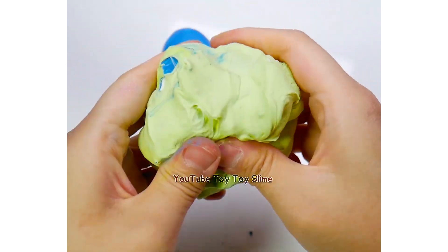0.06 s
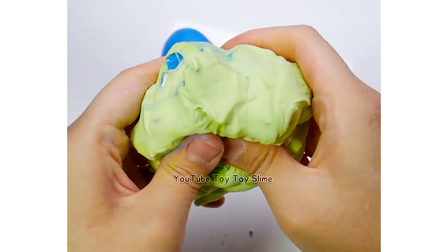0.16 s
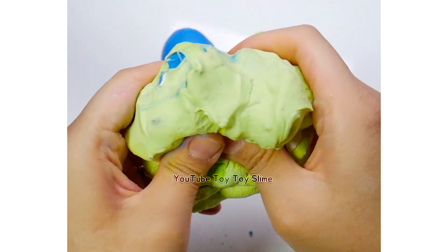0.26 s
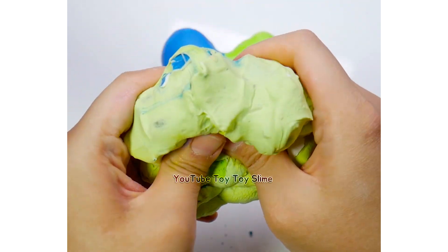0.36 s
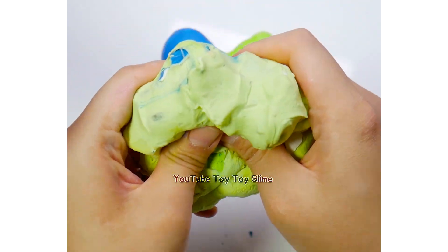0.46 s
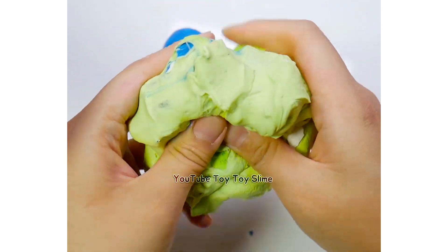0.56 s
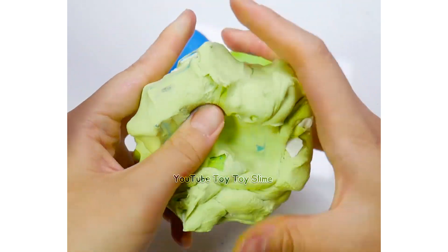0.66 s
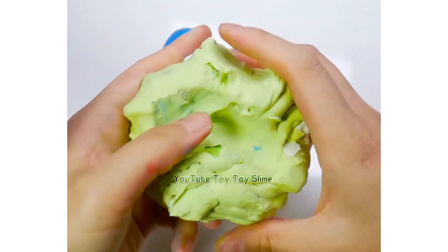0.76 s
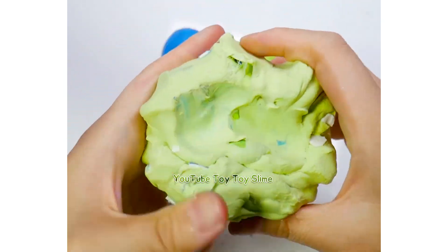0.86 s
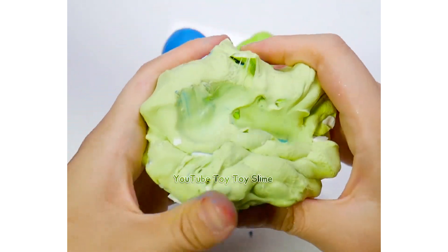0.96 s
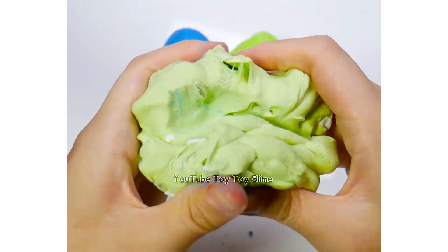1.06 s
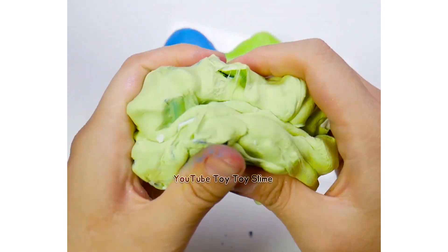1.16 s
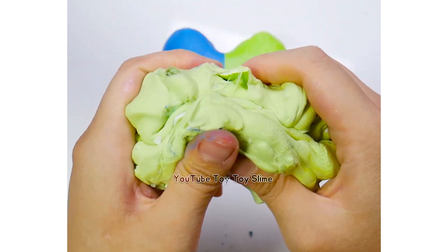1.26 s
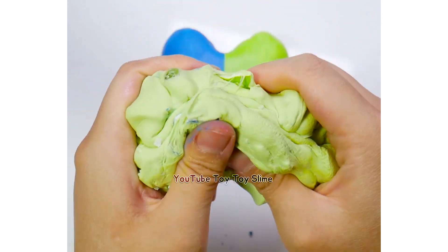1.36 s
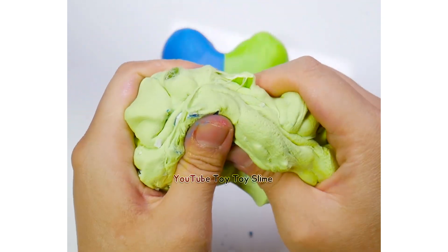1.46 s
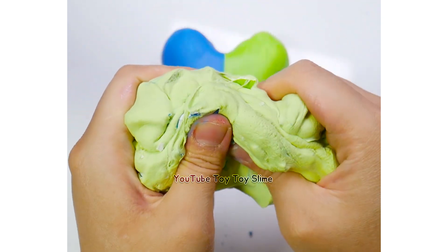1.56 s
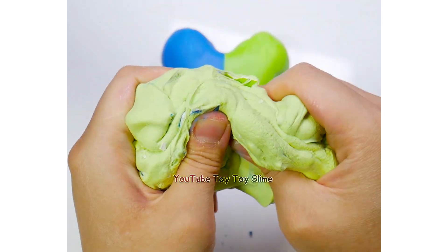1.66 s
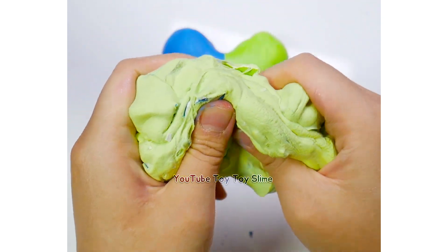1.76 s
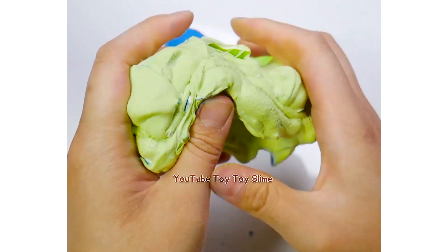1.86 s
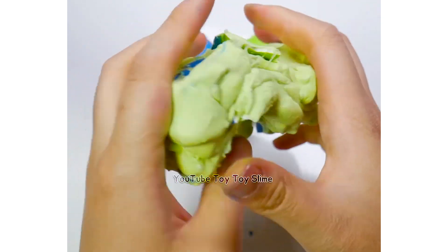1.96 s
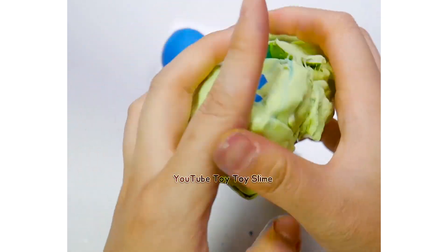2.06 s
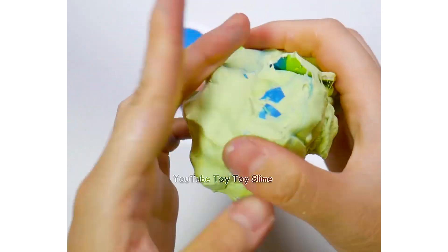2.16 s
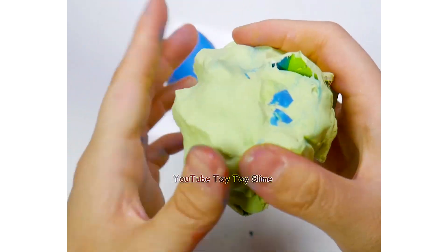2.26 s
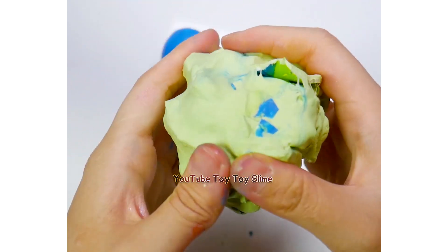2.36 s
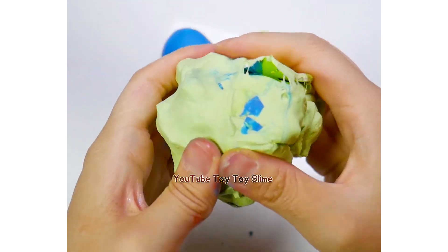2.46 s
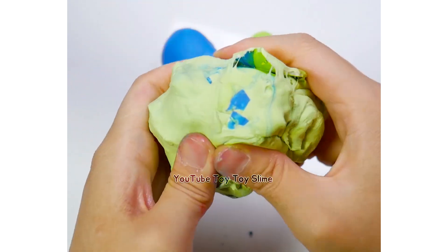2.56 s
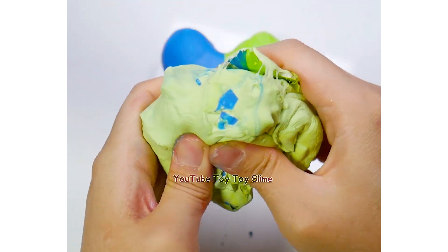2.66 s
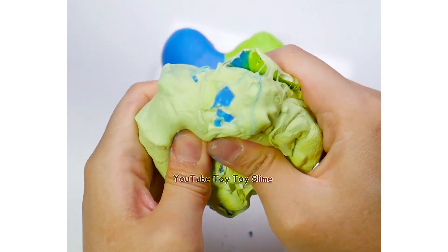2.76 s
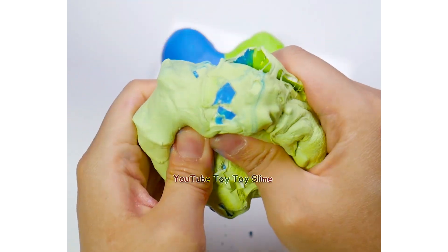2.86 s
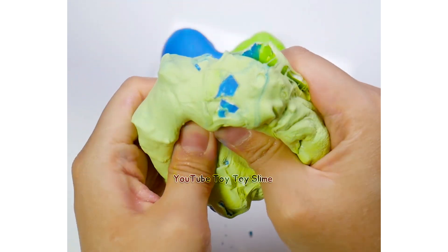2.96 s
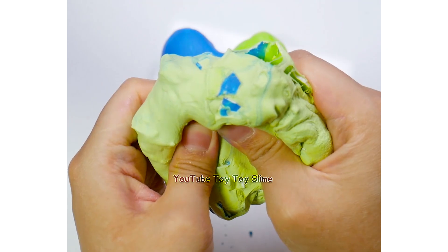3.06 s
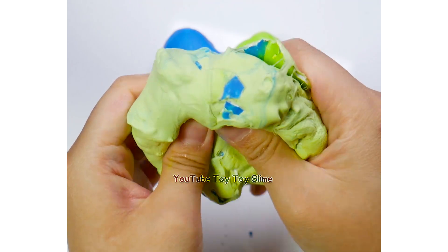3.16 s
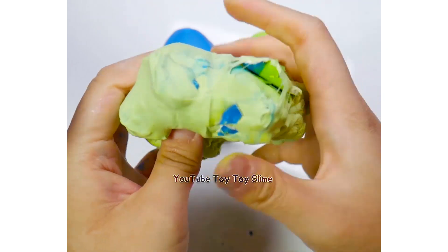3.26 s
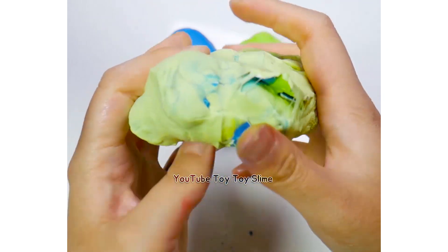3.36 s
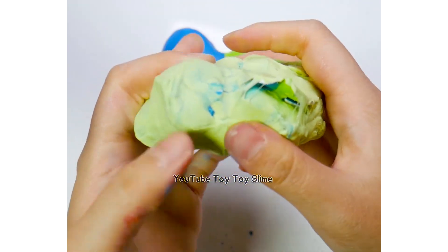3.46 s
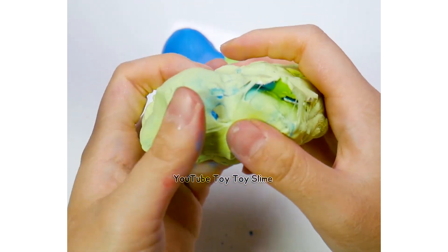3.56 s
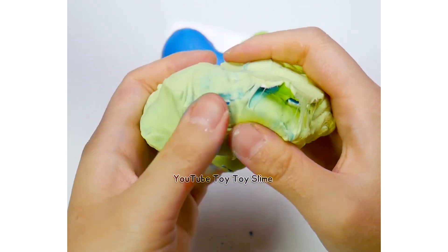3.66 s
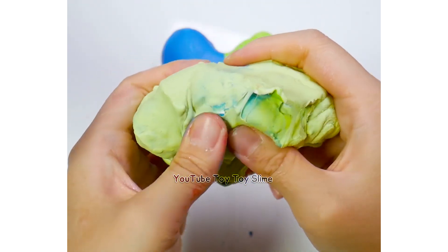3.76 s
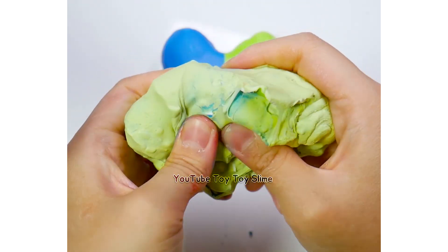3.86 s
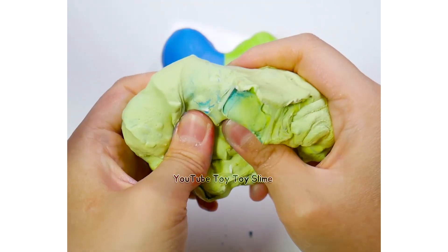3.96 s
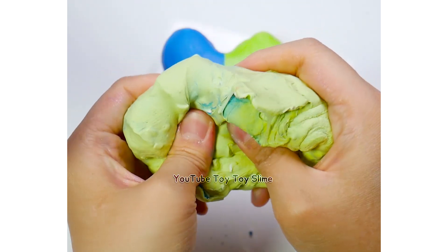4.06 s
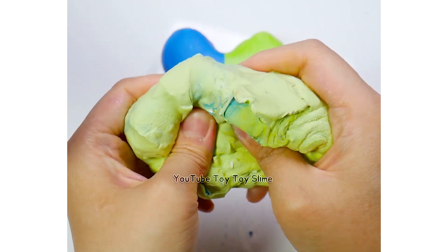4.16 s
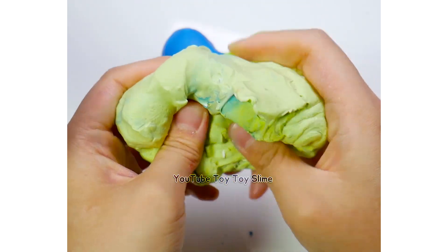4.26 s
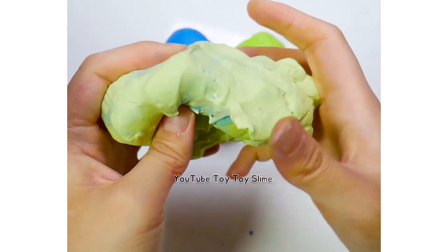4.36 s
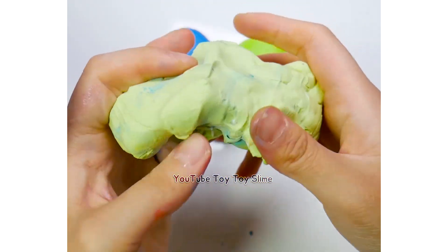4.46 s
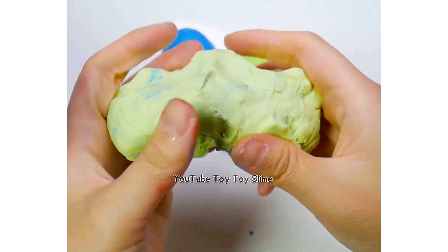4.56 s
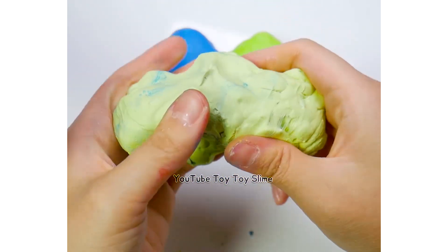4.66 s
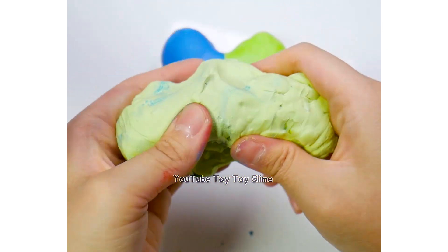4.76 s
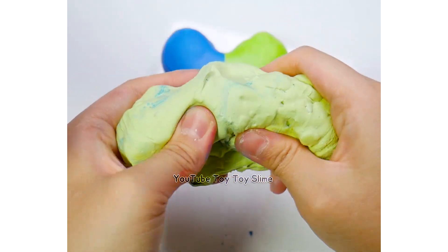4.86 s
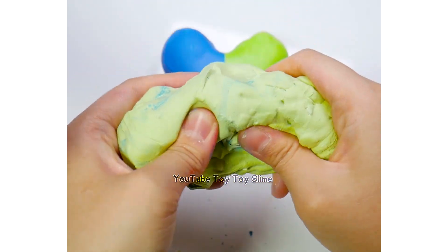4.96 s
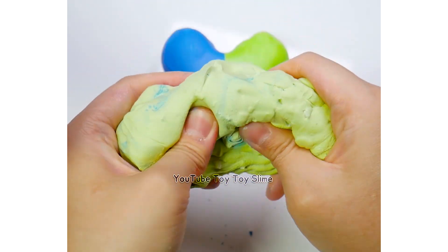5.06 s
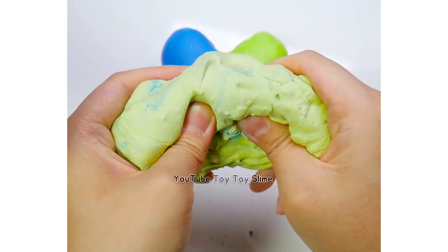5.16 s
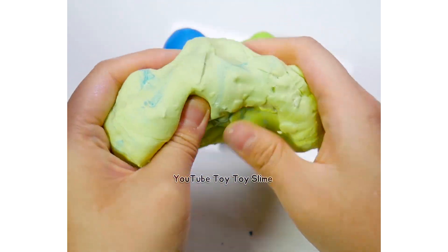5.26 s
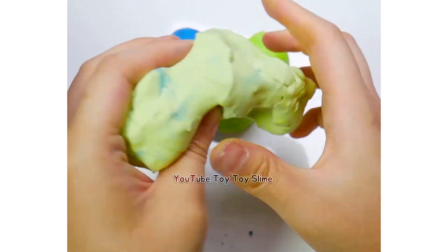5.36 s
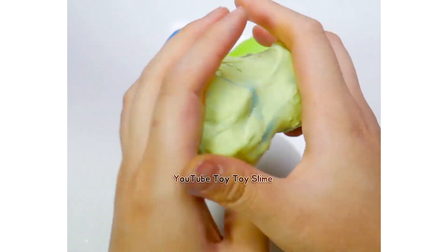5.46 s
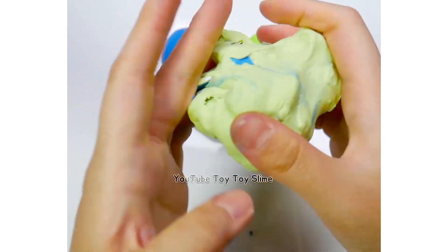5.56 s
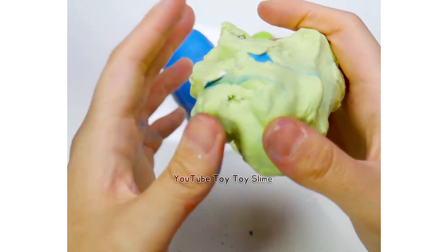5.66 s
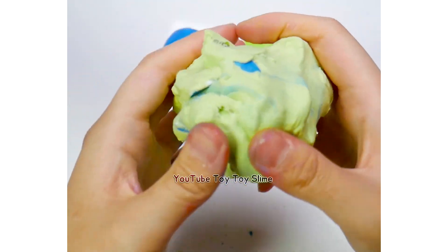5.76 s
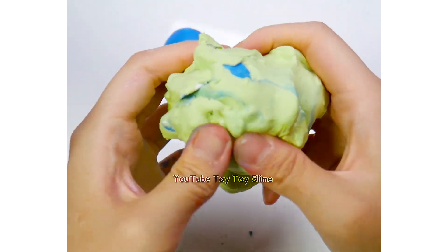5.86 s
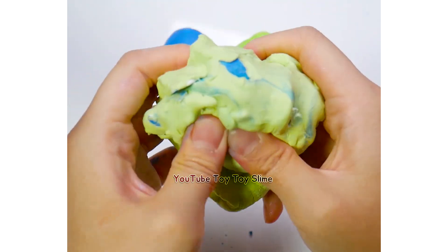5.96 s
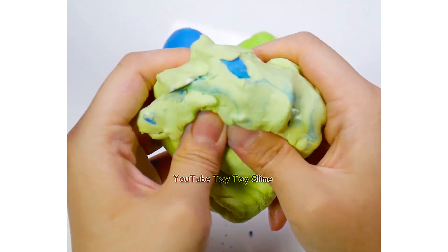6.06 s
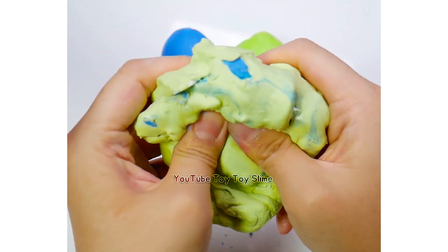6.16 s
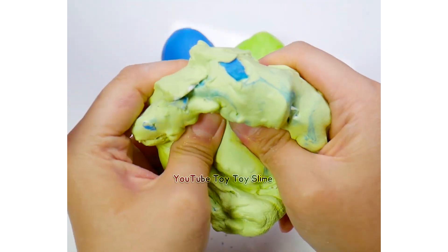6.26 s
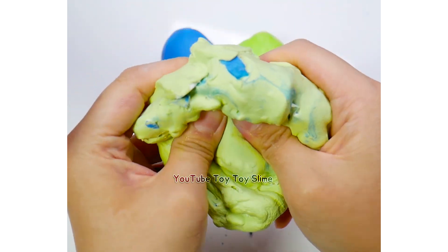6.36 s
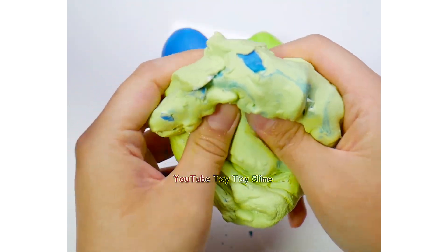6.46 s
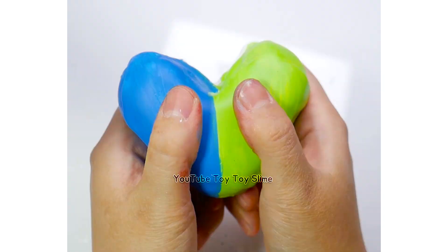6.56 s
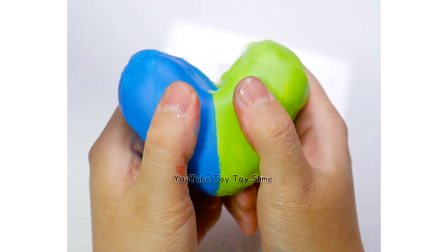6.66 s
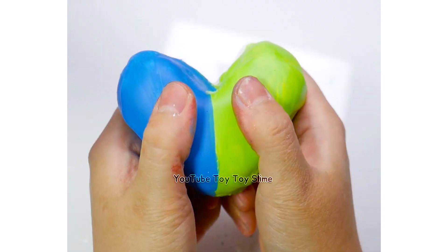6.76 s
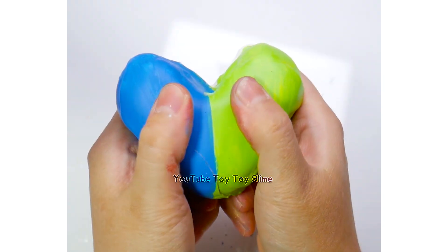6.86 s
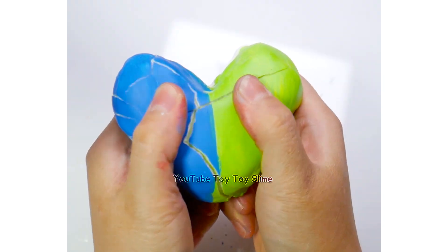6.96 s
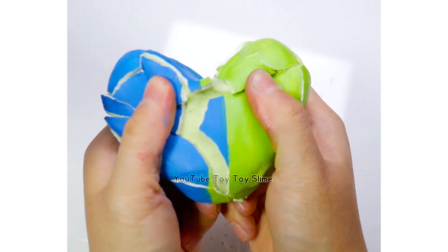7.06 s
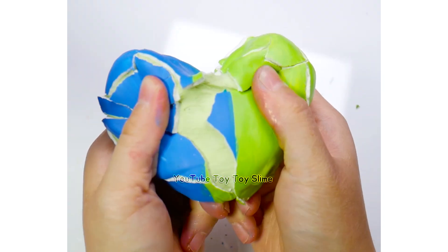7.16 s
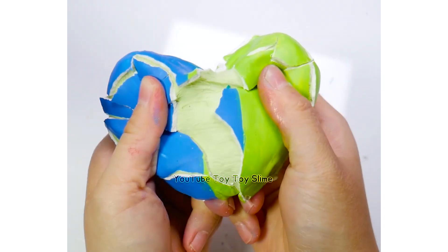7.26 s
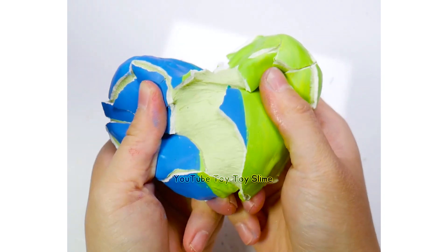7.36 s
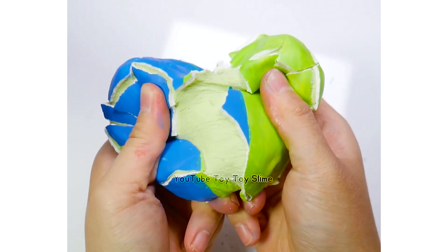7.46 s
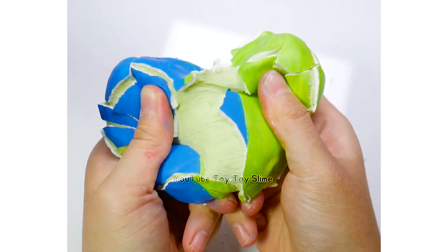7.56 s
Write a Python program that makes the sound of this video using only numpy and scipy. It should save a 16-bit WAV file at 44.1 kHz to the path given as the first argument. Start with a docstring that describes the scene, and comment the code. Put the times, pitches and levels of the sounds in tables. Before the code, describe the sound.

A close microphone in a small, fairly dry room, with faint room tone and hiss. Two hands knead soft clay full of brittle shards. From 0 to 0.5 s bright snaps click in a quick cluster; a sticky peel follows at 0.6 s, then harder pops around 1.2 to 1.55 s. A broad tacky crackle swells at 1.9 s, then fine clicks until a strong tight run of snaps at 2.6 to 3.0 s. Another peel comes at 3.3 s, dense cracking from 3.75 to 4.2 s, and a sticky rip at 4.3 s. Isolated loud pops land near 4.9 and 5.05 s, soft peeling at 5.3 s, more snaps at 5.9 to 6.3 s. A last tacky release at 6.57 s gives way to faint creaks; at 7.0 s a fresh shell breaks in a hollow, dense crunch, trailing into sparse crumbling ticks by 7.6 s. Low dull palm pushes run underneath.

```python
"""In a small room, close to a microphone, two hands knead soft clay full of shell shards, then crack a fresh shell.
Breaks are short pairs of decaying rings; sticky dough is a dense crackle of random ringing grains.
The creaking shell is a train of slips sent through resonances; pushing palms are low noise.
Echoes and fading noise make the room, with steady room tone and hiss behind.
The loudest snaps overload the input."""
import sys
import numpy as np
from scipy import signal
from scipy.fft import rfft, irfft, next_fast_len
from scipy.io import wavfile
from scipy.ndimage import uniform_filter1d

SR = 44100
rng = np.random.default_rng(int(sys.argv[2]) if len(sys.argv) > 2 else 0)


def store_pcm(level_fs):
    """Save levels as 16-bit WAV."""
    pcm = np.round(np.clip(level_fs, -1, 1) * 32767).astype(np.int16)
    wavfile.write(sys.argv[1], SR, np.atleast_2d(pcm).T)


N = 335601   # length in samples
STEP = 32   # slow level curves are worked out once per this many samples

# Colour of the room tone. Each row: frequency in Hz, relative level in dB per Hz.
AIR_COLOUR = [(15, -44.5), (25, -36), (123, 11), (175, -26), (326, 14), (476, 5.5), (1230, 1), (2220, -18),
              (3620, -0.5), (4740, -17), (14800, -8.5), (16000, -19.5)]
AIR_DB = -55
# Colour of the steady hiss. Each row: frequency in Hz, level in dB before HISS_DB is added.
HISS_COLOUR = [(30, 13), (300, 18), (2000, 17), (16000, 15)]
HISS_DB = -67.5
# How long the room rings. Each row: frequency in Hz, time to fall 60 dB in seconds.
ROOM_T60 = [(200, 0.27), (530, 0.3), (1400, 0.19), (3700, 0.24), (9700, 0.11)]
# Colour of the sound from the walls. Each row: frequency in Hz, relative level in dB.
ROOM_COLOUR = [(200, -27.5), (700, -29), (1500, -20.5), (2600, -24), (3800, -26), (5500, -32.5),
               (12000, -30)]
# Echoes from the table and near walls. Each row: delay in milliseconds, level in dB.
ECHOES = [(3.6, -20), (5.2, -25), (15.0, -31.5)]
WALLS_MS, WALLS_RISE_MS = 9.4, 2.5   # when the fading noise starts, and how long it fades in
# Colour of what differs between left and right. Each row: frequency in Hz, relative level in dB.
WIDTH = [(100, -4), (1000, -12), (4000, -8), (8000, 2), (15000, 1)]

# Dull pushes of the hands. Each row: time of the top in seconds, level in dB.
PUSHES = [(0.23,-43),(0.36,-40),(0.44,-47),(0.642,-30),(0.82,-41),(0.95,-45),(1.24,-50.5),(1.32,-45),(1.909,-29.5),(2.2,-38.5),(2.35,-39.5),(2.385,-40),(2.67,-51.5),
          (2.779,-35),(3.27,-43),(3.35,-34.5),(3.601,-34.5),(3.809,-32),(4.13,-48),(4.34,-37.5),(4.56,-36),(4.639,-29.5),(4.9,-45.5),(5.07,-42),
          (5.34,-36),(5.49,-35.5),(5.62,-44.5),(5.931,-37.5),(6.18,-41),(6.29,-46),(6.57,-40),(6.72,-45.5),(6.93,-32),(7.06,-20),(7.2,-50),(7.4,-57),(7.61,-46)]
PUSH_RISE_S, PUSH_FALL_S = 0.04, .05   # seconds per 20 dB
GRIP_DB = -58   # the steady grip below the pushes

# Colour of the dough grains. Each row: frequency in Hz, relative level in dB per Hz within its size group.
CRACKLE = [(120, -36), (200, -10.5), (749, 10.5), (899, -1), (1040, -24), (1250, 4.5), (2170, 9.5),
           (3690, 15.5), (13100, -17.5), (16000, 9.5)]
# The two borders between coarse, middle and fine grains, in Hz.
GRAIN_BORDERS_HZ = [1500, 5000]
GRAINS_PER_S, UNEVEN_DB = 20000., 2.5   # grains of all pitches together; scale of their random strength
# Fingers slide on the lump throughout. Each row: time in seconds, level of the fine grains in dB.
SLIDE = [(0,-44.5),(0.3,-56),(0.72,-58),(0.89,-75),(1.03,-69),(1.15,-52),(1.7,-52.5),(1.78,-63),(2.05,-56.5),(2.33,-79),(2.5,-54),(2.62,-45.5),(3.05,-81.5),(3.4,-68),(3.55,-51),(3.7,-67),(3.85,-56),
         (4.2,-67.5),(4.55,-49.5),(4.85,-68),(5.2,-73),(5.55,-49),(5.8,-68),(6.3,-62),(6.62,-73),(7,-40),(7.61,-49.5)]
# Coarse and middle grains of the slide, both in dB relative to the fine ones.
SLIDE_GRAINS_DB = [-5, -1]
# Dough peels off the skin in swells. Each row: time of the top in seconds, fine grains in dB,
# middle and coarse grains in dB relative to fine, seconds to rise 20 dB, seconds to fall 20 dB.
# Slopes below 2 ms, also negative ones, count as 2 ms.
PEELS = [(0.612,-32.5,2,1,0,0.06),(0.636,-23.5,0.5,-0.2,0.0261,0.0738),(0.74,-53,7,-4,0.5,-0.4),(0.802,-49,10,-1,0.14,-0.09),(1.066,-43.5,3,4.5,.015,0.02),(1.882,-22,-1,-7.5,.055,.11),
         (2.164,-43,-7,-11,0.1,0.16),(2.276,-44.5,-1,-3.5,0.23,0.1),(3.292,-24.5,0.5,-4.5,0.0658,.05),(3.342,-38,3,2.5,.03,0.02),(3.449,-40,3,2,0.02,0.04),(3.49,-40,-2,-6,0.06,0.11),(3.76,-48,11,6,-0.12,0.22),(3.93,-48,-1,-5.5,-0.2,0.4),(4.309,-35,6.1,0,-0.03,.03),(4.326,-24,-0.5,-1,0.01,0.11),
         (4.379,-33.5,-4,-3,0.01,.065),(4.479,-47,-9,-2.5,-0.5,0.2),(4.552,-40,0,0,-0.13,0.1),(4.626,-33.5,0.7,-11,-0.18,0.0357),(5.334,-23,-1.5,-6,0.04,0.0946),(5.481,-33.5,-3,-1,0.02,0.11),
         (5.664,-34.5,-4.5,-5.5,.05,0.02),(6.05,-54.5,8,3.5,0.36,0.3),(6.529,-38,7,1.1,0,-0.19),(6.57,-20.5,0.3,-6,0.04,0),(6.933,-34,4.5,-8,0,-0.25),(7.07,-32,-9,2,0.0056,0.14),(7.199,-35,13,1.1,0.0065,-0.09),(7.425,-39,5.5,7,-0.27,0.03)]
# After a break the shard crumbles in grains near the pitch of its rings.
CRUMBLE_DB, CRUMBLE_OCTAVES = -44, .45   # level added to the break's wall level; spread in pitch
CRUMBLE_DELAY_S, CRUMBLE_FALL_S = 0.0058, 0.078   # from break to top; seconds to fall 20 dB

# Shards, and last the fresh shell, creak under the thumbs in bouts.
# Each row: time of the top in seconds, level in dB, hollow body in dB relative to that level.
CREAK = [(0.19,-44,-5),(0.47,-32,-21),(1.12,-49.5,-15),(1.16,-38.5,-22),(1.2,-42,-18),(2.03,-46,-17),(2.09,-46,-9),(2.56,-46.5,-13),(2.6,-40.5,-13),(3.18,-51,-15),
         (4.83,-56,-16),(5.83,-50.5,-14.5),(6.08,-49.5,-14),(6.13,-48.5,-15),(6.731,-45,-8),(6.8,-48,-2),(6.889,-30.5,-9),(6.94,-33,-3),(7.04,-19.5,4),(7.15,-25,-7),(7.22,-37,-3),(7.33,-78,-2)]
CREAK_RISE_S, CREAK_FALL_S = 0.041, 0.095   # seconds per 20 dB
# Rings of the shell wall. Each row: frequency in Hz, width in Hz, relative level in dB.
SHELL = [(2930, 170, 7), (3750, 400, 1), (6400, 2400, -8.5)]
# Air and body under the shell. Each row: frequency in Hz, width in Hz, relative level in dB.
HOLLOW = [(333, 110, 1.5), (495, 170, -2.5), (800, 240, -4.5)]

# The breaks that stand out. Each row: start in seconds, ring level in dB, main ring in Hz, second ring in Hz,
# second ring in dB relative to the main one (6 at most), sharp edge in dB before a 10 dB cut,
# time for the rings to fall 60 dB in milliseconds, share sent to the walls in dB.
SNAPS = [(0.018,-18,2690,6100,-16,-13,3.1,15.5),(0.1225,-27,2520,1464,-19,-55.5,12,-4),(0.1788,-15.5,3400,8850,-5.5,-33,2.8,11),(0.2282,6.5,2240,1210,-56,-33,4.9,-0.5),
         (0.2882,-13.5,1780,3320,-4,-34,4.4,3),(0.2975,-12.5,3400,1647,-19,-39,7,10),(0.323,-5.5,850,1560,-0.5,-25,11,5),(0.3407,-10,3500,1800,-14,-41,5.3,2.5),
         (0.3457,3.5,3250,1770,-5.5,-23,11,2),(0.3616,-12.5,2637,5230,-20,-30,10,-3),(0.4032,-17.5,8947,2870,2,-6,7,0),(0.419,-24,3262,1860,-12,-30,7,-5),(0.447,7.5,3910,5060,-7.5,7,6.9,6),
         (0.448,-9,4330,2900,-14,-30,7.7,-6),(0.456,-11,3630,2840,6.5,-25,18,-9),(0.4734,-11.5,3870,2930,-12,-38,19,-3),(0.6213,-13,2850,1475,-2,-8,5.5,-3),
         (0.635,-7.5,750,4300,-2,-3,4.2,-18),(0.7974,-8.5,3040,1600,-12,-32,5,8),(0.806,-16.5,1300,3370,-3,-30,6.9,-3),(0.815,6,3480,6600,-9,-19,3,-10.5),(0.9373,-24.5,3700,6400,-6,-38,8.8,6),
         (0.9505,-31.5,8031,2950,-5,-20,7.4,21.5),(1.1785,-22.5,3120,1940,-5,-31,6.5,16),(1.2349,11.5,3420,870,0,-23,8.5,0.5),(1.2814,9,6000,3040,-29,-14,6.7,1),
         (1.299,13.5,8210,3380,-1,23,5.5,1.5),(1.3097,-13,3820,8214,-14,-19.5,6,-3),(1.355,-3.5,673,405,-44,-3,16,2.5),(1.4356,-11.5,3750,2190,-13,-11,4.3,6),
         (1.4437,-1,3630,1658,-23,-20,5.3,1),(1.4611,-14,3420,1894,-10,-15,7,1),(1.5103,-24,4425,7730,-11,-23,4,-3),(1.5348,-26,1970,3640,-15,-32,7.6,8),(1.549,10,3700,1940,-7.5,-37,1.9,-3.5),(1.615,-23.5,3300,5740,-5,-25,7,-3),(1.8866,-9,660,3500,-1.5,-19,15,12),
         (1.9032,-11,2960,7960,-1,-17,15,-3),(1.9165,-7,2520,5160,-3,-4,6.5,0),(1.9332,-13.5,9000,3700,-1,-18,8.7,-5),(1.9637,-13,3500,1240,0.5,-29,5.4,-1),
         (2.0751,-21,3620,6815,-28.5,-18,8.7,8),(2.0858,-23,3530,1900,-10,-22,6.8,1),(2.1993,-19,3550,8000,-3.5,-4.5,21,3),(2.2406,-22.5,627,1320,-3,-7,19,5),(2.279,-13.5,2800,7500,-7,-6.5,3.4,-18),
         (2.369,-25,3000,524,0.5,-29,8,6),(2.4364,-3,2440,6100,-3,-26,1.46,-4),(2.4876,-26.5,3580,8462,-17,-15.5,6.1,-8.5),(2.5367,-27.5,4800,9100,-9.5,-32,18,-3.5),(2.603,-22,2444,4263,-7,-55,7.8,0.5),(2.6152,-11.5,2820,1540,-11.5,-23,2.6,8),
         (2.6502,6,2520,1220,-7,10.5,3.7,-2),(2.6674,-9,2730,7000,-14,-31,8.9,7.5),(2.685,-6,3500,1270,-4,-33,6.8,-14),(2.7031,11.5,1470,850,-8.5,-13.5,8.2,2.5),
         (2.7055,4,1450,2550,-14,3,3.5,-9.5),(2.7565,-4,2131,3570,-3,-23,9.5,-4),(2.7706,5.5,2260,940,0.5,-20.5,16,-6),(2.777,9.5,1760,827,2,-11,7.9,1.5),
         (2.783,4,2050,1230,-1,-18,12,6),(2.8157,16.5,885,450,-34,-8,6.2,-11.5),(3.0137,3.5,2670,950,-14.5,-38,5,0),(3.0206,-8,2010,1310,-0.5,-39,7,5.5),
         (3.113,-29.5,3700,1800,-1.5,-40,6,0),(3.2441,-16,7999,3970,-2,-29,7,-12),(3.257,-16,4360,1250,-3,-22,25,-6),(3.2661,-7,3940,1180,-2.5,-26,11,9),(3.306,-11.5,4760,2850,-3,-18,8.8,-3),
         (3.4484,-21.5,1760,5500,-5,-37,14,9),(3.549,-27,3040,5157,-14,-35,7,1),(3.5887,-21,2637,290,-2.5,-21,4.4,2),(3.593,-7.5,3750,2050,-9,-3.5,3.3,2.5),(3.6126,-11,4630,7570,0.5,-6,2.9,-12.5),(3.7519,-23,1345,3040,3,-37,7.7,17),
         (3.7711,-2,5630,1350,2.5,-7,1.85,-2.5),(3.7838,-9.5,7550,3380,-5,-14,5,-4),(3.7914,-13,3180,2010,-1,-39.5,8.3,-16),(3.8119,7.5,2590,1720,-1,-12,5.7,0.5),
         (3.8456,-10.5,3160,1870,-8,-24,7.1,-1),(3.9541,2,1600,2630,-5,-28,3.8,-0.5),(3.9698,7,2660,1360,-0.5,-27,9,-4),(3.987,8.5,2720,1320,-5.5,-5,4.5,-1),
         (4.09,-22.5,1660,3100,-5,-22,7.7,8),(4.1134,-8.5,2130,3811,-17,-15,7,7),(4.128,10,790,2820,-4,-2,7.3,-6.5),(4.1427,16,2360,1470,0,-12,4.5,-9.5),
         (4.1546,-0.5,3300,1910,-4,-20.5,4.4,2),(4.1731,-19,8900,3730,0,0,12,-11),(4.3262,-9.5,3620,9540,-2,2,9.5,12.5),(4.4712,-22.5,5700,1250,-8,-24,8,-3),
         (4.485,-22.5,4000,1040,2,-13,12,-1.5),(4.5754,-45,7860,3550,-1,-21,3.6,5),(4.63,-20.5,4700,1270,2.5,-9,5.7,5),(4.755,-32,5300,3000,-5,-40.5,5.4,-3),(4.7698,-22.5,5170,2730,-4,-40,6.1,4),
         (4.8975,15.5,736,2160,-9.5,-27.5,8.2,-3),(4.9655,-25.5,5500,3800,-17,-35,7.2,7.5),(5.051,15.5,894,3254,-4,9.5,7.6,-3),(5.1185,4,2280,4000,0,-11,2.6,-7.5),
         (5.223,-36.5,7100,5000,-10,-41.5,3.4,7),(5.3167,-11,8500,3940,-14,-4,8.7,2.5),(5.3232,-13.5,9030,908,2.5,-14,23,6),(5.3926,-15,6400,3768,-16,-25,7.4,-2.5),(5.417,-21,6115,2250,2,-31,4.7,15.5),
         (5.4717,-16.5,3450,6560,-7,-6,7.7,-4),(5.486,-17,2800,1150,1,-13,7.7,-3.5),(5.5651,-17.5,3840,2130,0,-16,5.5,7.5),(5.6198,-14.5,2700,860,1.5,-7,10.7,10.5),
         (5.6527,-21,1260,7385,-17,-26,9.4,0),(5.6732,-20.5,7400,3000,-3.5,-12,14,-1.5),(5.7126,-32,5480,3160,-4.5,-19,8.4,-4),(5.8869,4.5,2070,3770,-1.5,-7,5.4,-4),(5.924,7.5,2500,3850,-2,-23,3.8,-2),
         (5.9628,12,3700,8900,-13,5.5,5.5,-2.5),(6.1799,8.5,2670,1760,-9.5,-16,7.6,-1.5),(6.1953,-18,2500,4446,-18,-46,9.1,-3),(6.2862,10.5,2530,778,-2.5,-12,7.2,4),
         (6.3717,-10.5,3250,880,-0.5,-43,6.9,2.5),(6.455,-18.5,7360,3960,-11.5,-32,7.7,3),(6.5154,-17.5,1230,2920,-4,-33,8,4),(6.5566,-13,5130,2970,-10,-10,6.3,-9),
         (6.721,-20.5,444,820,-53,-58,28,8.5),(6.757,-30,3563,6300,-3,-39,8.2,-1),(6.802,-29.5,462,3000,-17,-32,10,-7),(6.84,-25,460,9100,-4,-35,7,-1),(6.8519,-16,3380,440,3,-29,5.4,9),(6.8758,-7,494,894,-13,-33,3.7,1),(6.8806,-11,686,1420,3.5,-16.5,2,8),
         (6.908,-7,624,1090,-11,-35,4.8,-11),(6.9235,-4,368,925,-17,-26,13,-6),(6.933,-13,549,312,-5,-10,7,-3),(6.971,-8.5,3897,810,2.5,-28,2.7,1),
         (7.0081,-13,462,807,-18,-21.5,8.6,0),(7.021,14.5,3690,580,4.5,-8,8.4,-13),(7.0313,17,3700,510,-3,-7,7,-10.5),(7.035,13,545,1290,1,1,6,-7),
         (7.0378,14,2850,500,-28,-10,10,10.5),(7.0508,1.5,650,3730,-8,-4,16,-11),(7.0597,10.5,2240,794,1.5,-11,12.4,-2),(7.062,-1.5,800,6700,4.5,-16,5.2,-16),
         (7.0774,6.5,510,3700,-12,-6,4.5,-3),(7.078,6,452,3600,-8,9,6.9,-3),(7.0885,-21,6650,900,-3,-21,7,-3),(7.1051,2,2700,4200,-11,0,7.5,1),(7.1257,-10,2810,1630,0,-19,6.4,15),
         (7.147,-14.5,2970,697,-3,-35,46,-3),(7.156,-17,2880,3700,-10,-35,53,-3),(7.171,6,3100,500,5,-17,4.3,-10),(7.1904,4,650,2980,-3,-14,2.8,-7),
         (7.1994,-1,3400,1010,2.5,-12,4,4),(7.2254,-7,3680,6800,-5,-10,2.4,2),(7.2647,-22,6000,2767,-3,-17,7,-7),(7.339,-12,3830,6860,-9,-10,5.1,10),(7.3865,-10,740,1900,1.5,-31,3.2,0.5),
         (7.4146,-17.5,6400,3014,-0.5,-15,4.6,-12),(7.477,-28,2368,1356,1,-30,4.5,-3),(7.549,-27,650,2853,-2,-42,9.7,-6.5),(7.5775,-18,3330,398,-25,-47,7.3,4),(7.5924,-20.5,750,441,-9,-37,7.7,6)]
PRESENCE_HZ = 3700   # a bright microphone peak, heard in every break
TICKS_PER_S, TICK_DB, TICK_SPREAD_DB = 10, 22, 5   # small chance breaks; level above the slide, plus or minus

QUIET_DB, QUIET_SLOPE = -46, .7   # below this level the gain sinks by this many dB per dB
CUTOFF_HZ = 16500


def from_db(db):
    """Turn a level in dB into a gain."""
    return 10 ** (np.asarray(db) / 20)


def rms_one(x):
    """Scale a sound to unit power."""
    return x / np.sqrt(np.mean(x ** 2) + 1e-20)


def at_hz(points, hz):
    """Read a frequency table at any frequency, on a logarithmic axis."""
    table_hz, values = np.transpose(points)
    return np.interp(np.log(hz + 1), np.log(table_hz), values)


def coloured(x, points):
    """Weight the spectrum of a sound by a table in dB."""
    size = next_fast_len(x.shape[-1])
    gain = from_db(at_hz(points, np.fft.rfftfreq(size, 1 / SR)))
    return irfft(rfft(x, size) * gain, size)[..., :x.shape[-1]]


def opposite(side):
    """Put a sound on the left and its upside-down copy on the right."""
    return side * np.array([[1], [-1]])


def swell(s, rise_s, fall_s):
    """Power of a swell that tops at 1 at time s; each slope is the time for 20 dB."""
    t = np.arange(0, N, STEP) / SR - s
    return 100. ** -np.where(t < 0, -t / max(rise_s, .002), t / max(fall_s, .002))


def per_sample(power):
    """Turn a slow power curve into a gain at every sample."""
    return np.interp(np.arange(N) / STEP, np.arange(len(power)), np.sqrt(power))


def room_tone():
    """Steady coloured noise of the room's air, alike on both sides."""
    return from_db(AIR_DB) * rms_one(coloured(rng.standard_normal(N), AIR_COLOUR))


def steady_hiss():
    """Faint steady hiss, unrelated in the two channels."""
    return from_db(HISS_DB) * coloured(rng.standard_normal((2, N)), HISS_COLOUR)


def room(x):
    """A few near echoes, then after a gap the walls: noise dying band by band, slightly unlike left and right."""
    t = np.arange(SR // 2) / SR
    tail = np.zeros((2, len(t)))
    edges = 120 * 2 ** np.arange(0, 7.1, .5)      # half-octave bands
    for low, high in zip(edges, edges[1:]):
        hz = np.sqrt(low * high)
        band = signal.butter(2, [low, high], "band", fs=SR, output="sos")
        mid, side = signal.sosfilt(band, rng.standard_normal((2, len(t))))
        t60 = max(at_hz(ROOM_T60, hz), .03)
        level = from_db(at_hz(ROOM_COLOUR, hz) - 60 * t / t60) / np.sqrt(SR * 0.0026)
        tail += level * (mid + opposite(from_db(at_hz(WIDTH, hz) - 18.5) * side))
    tail *= np.clip((t * 1e3 - WALLS_MS) / WALLS_RISE_MS, 0, 1)
    for ms, db in ECHOES:
        tail[:, round(ms * SR / 1e3)] += from_db(db)
    return signal.fftconvolve(x[None], tail, axes=1)[:, :N]


def palms():
    """Lumpy low noise from the hands pressing, nearly alike on both sides."""
    band = signal.butter(2, [45, 190], "band", fs=SR, output="sos")
    mid, side = rms_one(signal.sosfilt(band, rng.standard_normal((2, N))))
    pushes = sum(from_db(db) ** 2 * swell(s, PUSH_RISE_S, PUSH_FALL_S) for s, db in PUSHES)
    power = from_db(GRIP_DB) ** 2 + pushes
    return per_sample(power) * (mid + opposite(from_db(-33.5) * side))


def slide_level():
    """Level in dB of the sliding fingers at every sample."""
    s, db = np.transpose(SLIDE)
    return np.interp(np.arange(N) / SR, s, db)


def grain_powers():
    """Powers of coarse, middle and fine grains as the fingers slide and the dough peels off."""
    power = np.outer(from_db([*SLIDE_GRAINS_DB, 0]), from_db(slide_level()[::STEP])) ** 2
    for s, fine_db, middle_db, coarse_db, rise_s, fall_s in PEELS:
        sizes_db = [fine_db + coarse_db, fine_db + middle_db, fine_db]
        power += np.outer(from_db(sizes_db) ** 2, swell(s, rise_s, fall_s))
    return power


def crumble_powers(pitches_hz):
    """Power at each grain pitch as shards crumble after the breaks in SNAPS."""
    power = 0
    for s, peak_db, main_hz, second_hz, second_db, *_, walls_db in SNAPS:
        main, second = [np.exp(-(np.log2(pitches_hz / hz) / CRUMBLE_OCTAVES) ** 2)
                        for hz in (main_hz, second_hz)]
        both = main + from_db(min(second_db, 6)) ** 2 * second
        share = from_db(peak_db + walls_db + CRUMBLE_DB) ** 2 * both
        power = power + np.outer(share, swell(s + CRUMBLE_DELAY_S, CRUMBLE_DELAY_S / 2, CRUMBLE_FALL_S))
    return power


def kneading():
    """Random grains of peeling and sliding dough and crumbling shard, each ringing a few cycles, in uneven clumps."""
    clump_band = signal.butter(2, [20, 200], "band", fs=SR, output="sos")
    clumps = rms_one(signal.sosfilt(clump_band, rng.standard_normal(N)))
    sizes_db = UNEVEN_DB * np.minimum(rng.exponential(1, N), 5) + 1.89 * clumps
    sizes = from_db(sizes_db) * rng.choice([-1, 1], N)
    born = rng.random(N) < GRAINS_PER_S / SR
    pitches = np.geomspace(220, 15000, 24)
    dealt = rng.integers(0, 24, N)      # which pitch each grain gets
    group = np.searchsorted(GRAIN_BORDERS_HZ, pitches)
    weight = pitches * from_db(at_hz(CRACKLE, pitches)) ** 2
    share = weight / np.bincount(group, weight)[group]      # each size group adds up to 1
    power = share[:, None] * grain_powers()[group] + crumble_powers(pitches)
    out = np.zeros(N)
    for k, hz in enumerate(pitches):
        r = from_db(-60 / (4.8 / hz * SR))      # falls 60 dB in 4.8 cycles
        w = 2 * np.pi * hz / SR
        grains = sizes * born * (dealt == k) + 1e-18
        rings = rms_one(signal.lfilter([1, 0, -1], [1, -2 * r * np.cos(w), r * r], grains))
        out += per_sample(power[k]) * rings
    return out


def resonate(x, modes):
    """Send a sound through resonances side by side, signs alternating, and scale to unit power."""
    out = 0
    for k, (hz, width, db) in enumerate(modes):
        r = np.exp(-np.pi * width / SR)
        top = [(1 - r * r) / 2, 0, (r * r - 1) / 2]
        bottom = [1, -2 * r * np.cos(2 * np.pi * hz / SR), r * r]
        out = out + (-1) ** k * from_db(db) * signal.lfilter(top, bottom, x)
    return rms_one(out)


def creak():
    """Uneven little slips along the growing cracks ring the shell wall and the hollow below."""
    wall, hollow = sum(np.outer(from_db([db, db + hollow_db]) ** 2, swell(s, CREAK_RISE_S, CREAK_FALL_S))
                       for s, db, hollow_db in CREAK)
    strength = from_db(3.1 * np.minimum(rng.exponential(1, N), 5)) * rng.choice([-1, 1], N)
    slips = strength * (rng.random(N) < 900. / SR)      # about 900 a second
    return per_sample(wall) * resonate(slips, SHELL) + per_sample(hollow) * resonate(slips, HOLLOW)


def ticks():
    """Small breaks at chance moments, stronger as the fingers slide harder, as rows like SNAPS."""
    draw = rng.random((int(TICKS_PER_S * N / SR), 4))
    slide_db = slide_level()[(draw[:, 0] * N).astype(int)]
    peaks_db = slide_db + TICK_DB + TICK_SPREAD_DB * (2 * draw[:, 1] - 1)
    return [(a * N / SR, db, 2200 * 4 ** c, 1200 * 6 ** d, -6, db - 5, 7, -2)
            for db, (a, _, c, d) in zip(peaks_db, draw)]


def snaps():
    """Each break sets two short rings going and starts with a bright edge; toward the walls it is a broader thump."""
    length = 2000      # samples per break
    near, far = np.zeros(N + length), np.zeros(N + length)
    t = np.arange(length) / SR
    treble = signal.butter(2, 5500, "high", fs=SR, output="sos")
    for s, peak_db, main_hz, second_hz, second_db, edge_db, t60_ms, walls_db in SNAPS + ticks():
        noise, sign = rng.standard_normal((2, length)), rng.choice([-1, 1])
        second_db = min(second_db, 6)
        # the crack runs on, so the ring is irregular
        wobble = 0.2 * np.cumsum(noise[0]) * np.sqrt(main_hz / 3000)
        main = np.sin(2 * np.pi * main_hz * t + wobble)
        second = from_db(second_db) * np.sin(2 * np.pi * second_hz * t - wobble)
        edge = from_db(edge_db - 10) * signal.sosfilt(treble, noise[1]) * from_db(-60 * t / 0.0054)
        onset = sign * from_db(peak_db) * (1 - np.exp(-t / .00008))
        # a few cycles of each ring, of the bright peak and of pitches beside the main ring
        thump_tones = [(main_hz, 0), (second_hz, second_db), (PRESENCE_HZ, -6),
                       (main_hz * 0.83, -5), (min(main_hz * 1.17, 15000), -3)]
        thump = onset * sum(from_db(db - 60 * t * hz / 5.3) * np.sin(2 * np.pi * hz * t)
                            for hz, db in thump_tones)
        rings = onset * from_db(-60e3 * t / max(t60_ms, 1)) * (main + second)
        at = round(s * SR)
        near[at:at + length] += rings + from_db(-20.5) * thump + edge
        far[at:at + length] += from_db(walls_db) * (thump + edge)
    no_bass = signal.butter(2, 260, "high", fs=SR, output="sos")      # small shards push no bass
    return signal.sosfilt(no_bass, [near[:N], far[:N]])


def scene():
    """Clay in the middle, room and air around it."""
    near, far = snaps()
    steady = kneading() + creak()
    # the crackle and creak differ more between left and right than the breaks do
    spread = from_db(-25.0) * near + from_db(-13.5) * steady
    # a quarter-cycle turn spreads the sound without making one side louder
    size = next_fast_len(N)
    turned = irfft(1j * rfft(spread, size), size)[:N]
    direct = near + steady + opposite(coloured(turned, WIDTH))
    walls = room(far + from_db(-25.5) * steady)
    return direct + walls + palms() + room_tone() + steady_hiss()


def record(dry):
    """The input clips; an expander holds the gain down until the sound has been loud a while, more in near silence."""
    clipped = dry / (1 + np.abs(dry) ** 6) ** (1 / 6)
    r = np.exp(-1 / (.04 * SR))      # 40 ms averaging
    power = signal.lfilter([1 - r], [1, -r], np.mean(clipped ** 2, axis=0))
    delayed = np.concatenate([np.full(130, 1e-5), power[:-130]])      # 130 samples late
    recent_db = 10 * np.log10(delayed + 1e-9)
    gain_db = uniform_filter1d(np.clip(.085 * (recent_db + 6), -4.3, 0), size=60)
    gain_db = gain_db + np.clip(QUIET_SLOPE * (recent_db - QUIET_DB), -8, 0)
    bass_cut = signal.butter(2, 30, "high", fs=SR, output="sos")
    low_pass = signal.cheby2(12, 60, CUTOFF_HZ, fs=SR, output="sos")
    levelled = signal.sosfilt(bass_cut, clipped * from_db(gain_db))
    return np.clip(signal.sosfilt(low_pass, levelled), -1, 1)


dry = scene()
out = record(dry)
store_pcm(out)
```